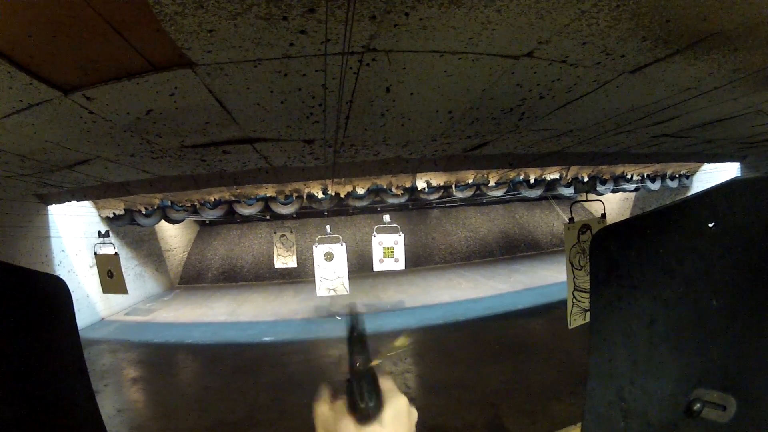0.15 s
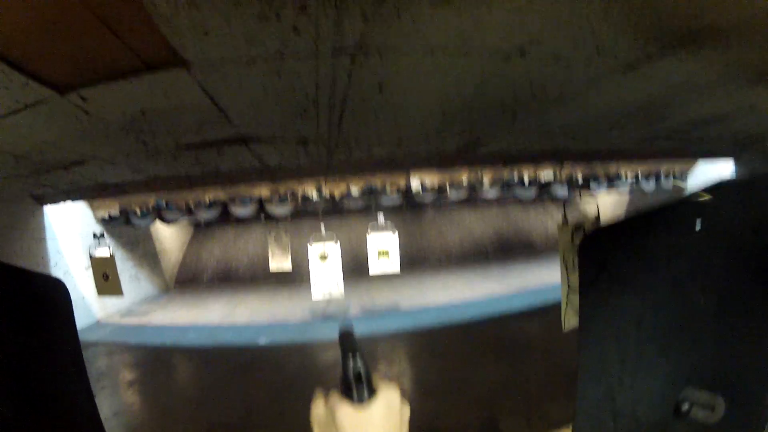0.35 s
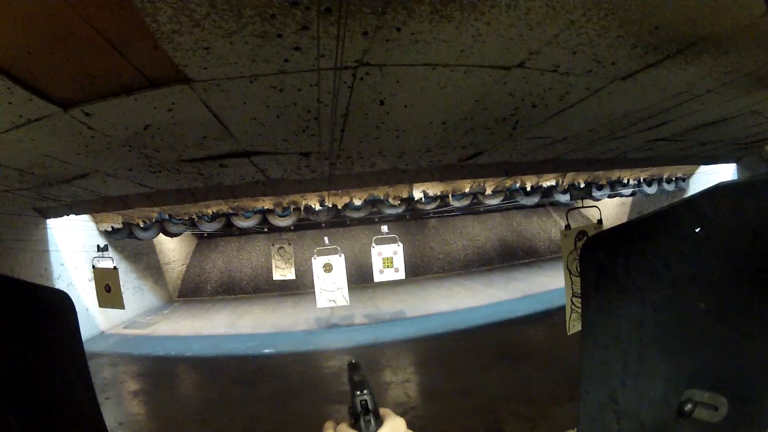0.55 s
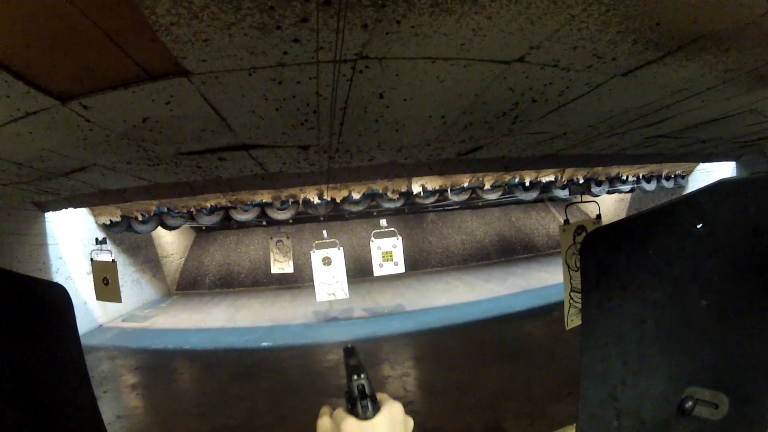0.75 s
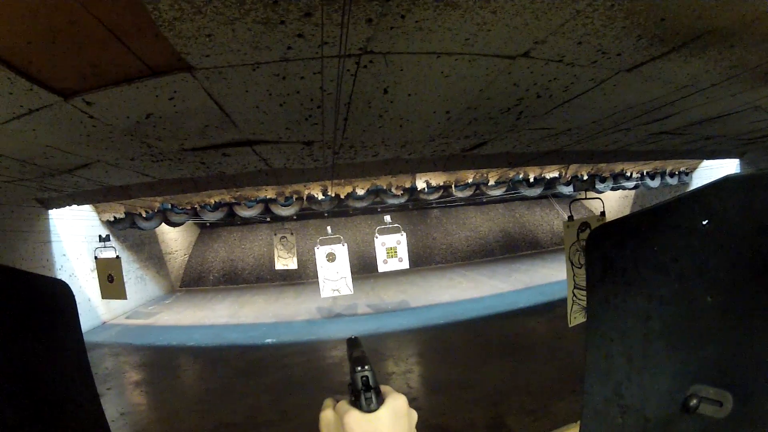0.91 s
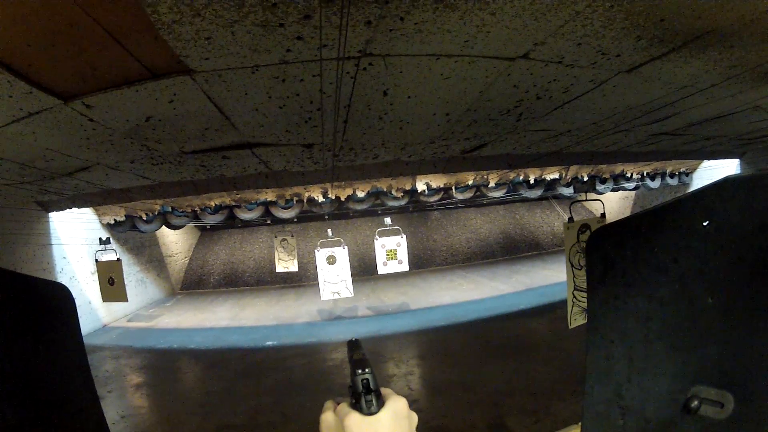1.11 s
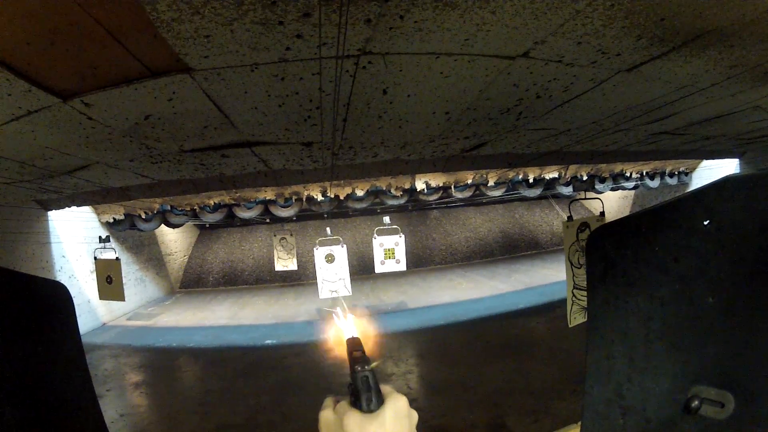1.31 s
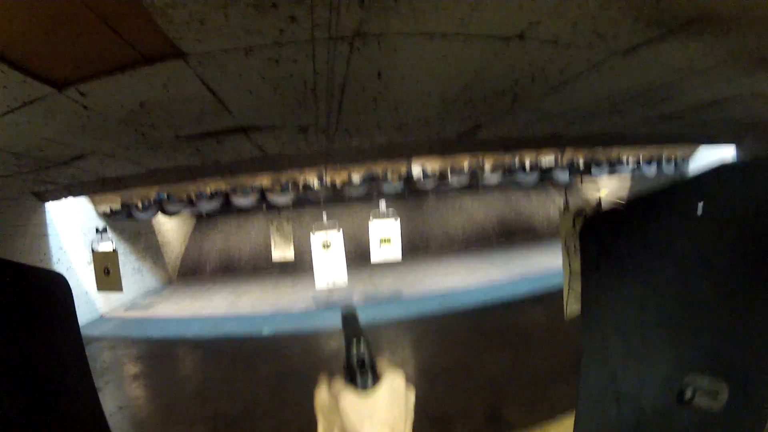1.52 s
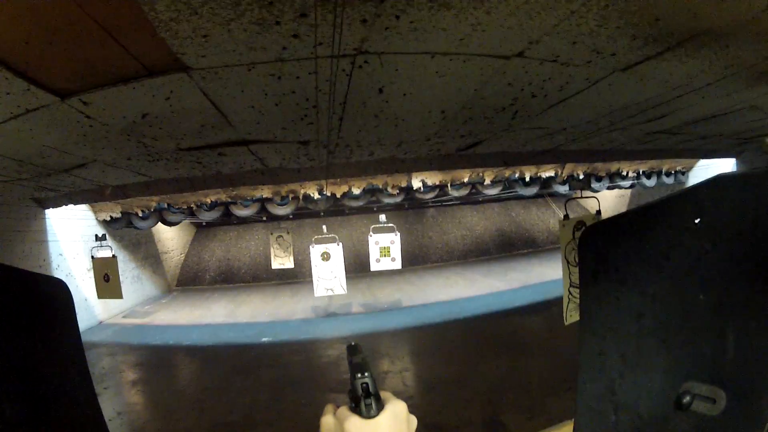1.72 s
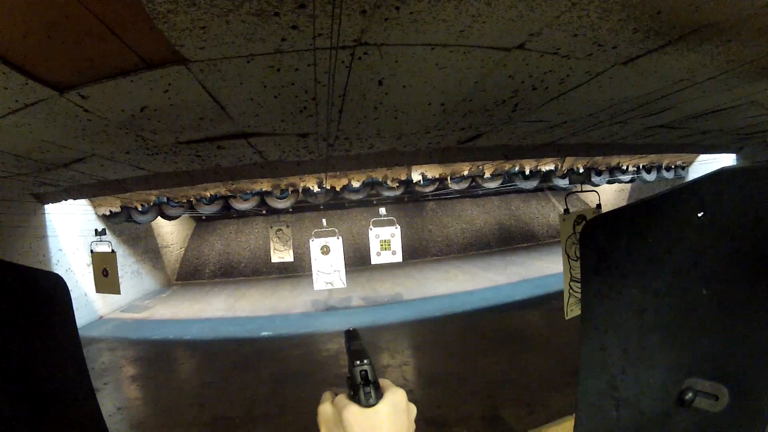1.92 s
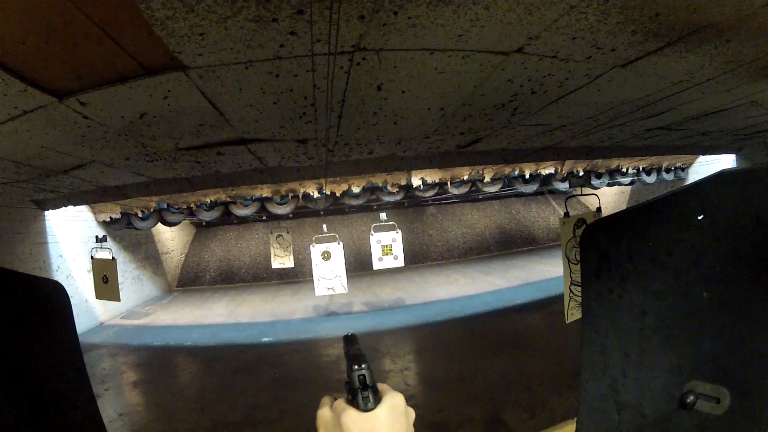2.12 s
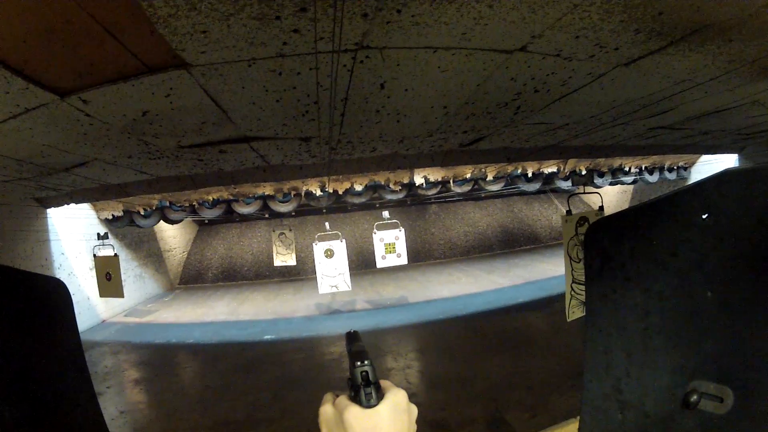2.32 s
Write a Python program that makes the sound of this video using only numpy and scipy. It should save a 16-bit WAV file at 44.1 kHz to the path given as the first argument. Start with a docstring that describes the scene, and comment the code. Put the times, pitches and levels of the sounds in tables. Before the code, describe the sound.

Loud pistol shots crack in an indoor shooting range, overloading the microphone and roaring through the hall.

```python
"""Shots in an indoor range

Four pistol shots, three close and one from another lane, reach a small mono camera. Each is shaped noise plus
booth and hall echoes; close ones add a pressure wave. The microphone overloads, then the automatic volume
ducks; as it recovers, it holds up the hall's roar before that dies. Light clacks, probably spent cases hitting
the booth, mix noise, metal ringing and a dull knock. Shaped noise makes the ventilation rumble."""
import sys
import numpy as np
from scipy import signal
from scipy.fft import rfft, irfft
from scipy.io import wavfile
from scipy.ndimage import minimum_filter1d

SR = 44100
rng = np.random.default_rng(int(sys.argv[2]) if len(sys.argv) > 2 else 0)


def unload_wav(signal):
    """Save mono or channel-first audio to the path in sys.argv[1] as 16-bit WAV at rate SR, clipped to [-1, 1]."""
    wavfile.write(
        sys.argv[1],
        SR,
        np.round(np.clip(np.atleast_2d(signal).T, -1, 1) * 32767).astype(np.int16),
    )


N = 103635  # length in samples

# In the tables, decay_s is the time to fall to 37 %, t60_s the time to fall by 60 dB.
# Spectra give the balance between pitches; their overall level is set elsewhere.

# Close shots: start_s, blast_db, decay_s, booth_db, hall_db
CLOSE_SHOTS = [(0.2008, 1.5, .013, -2.5, -8), (1.226, 0.5, 0.0096, -5, -10.5),
               (1.394, 8.5, 0.0072, -33, -8)]
# Pressure wave of the close muzzles: start_s, level_db, period_s
PRESSURE_WAVES = [(0.2006, 4.5, .0105), (1.2285, -3, .0068), (1.3952, 8.5, .0068)]
# Spectrum of a close blast: pitch_hz, level_db (per Hz)
BLAST_SPECTRUM = [(40, -30.5), (150, -7), (250, -2), (340, 0), (460, 3), (590, 0.5), (780, 0.5),
                  (950, -4.5), (1120, -6), (1500, 1), (2200, 0.5), (3000, 3), (3800, -1), (5000, -14.5),
                  (6200, -26.5), (8000, -5.5), (9300, -7.5), (11000, -25.5), (12500, -26.5), (14500, -16),
                  (16000, -8.5)]
# Spectrum of the booth's short echo: pitch_hz, level_db (per Hz)
BOOTH_SPECTRUM = [(60, -40.5), (350, -13.5), (600, -22.5), (900, -12.5), (1350, -8), (1610, 0.5),
                  (1780, -12), (2000, 3.5), (2400, -1.5), (2760, 2.5), (3050, -7.5), (3500, -7),
                  (4500, -17), (6000, -27.5), (8000, -17), (9400, -9), (10500, -15.5), (11400, -34),
                  (12700, -18), (13700, -17), (15000, -13.5), (15800, -29.5)]
# Spectrum of the hall's roar: pitch_hz, level_db (per Hz)
HALL_SPECTRUM = [(35, -20.5), (70, -17), (130, -2.5), (200, -5.5), (450, -3.5), (620, -4), (800, 1.5),
                 (1180, -9.5), (1500, -2), (1900, -7.5), (2650, -6), (3300, -12.5), (4200, -17.5),
                 (5400, -22.5), (6000, -41), (6600, -25), (8000, -23.5), (9500, -15.5), (10600, -22),
                 (11500, -26.5), (12000, -27), (12600, -24.5), (14400, -20), (15200, -19.5), (15700, -56.5)]
# How long the hall rings at each pitch: pitch_hz, t60_s
HALL_RINGING = [(100, 0.83), (300, 0.78), (900, 0.68), (2500, 0.86), (5000, 0.77), (10000, 0.86),
                (15000, 0.83)]
# Shot from another lane, arriving directly and off a wall: start_s, level_db, rise_s, decay_s
OTHER_LANE_CRACKS = [(1.7604, -12.5, 0.0021, 0.02), (1.766, -19, 0.00041, 0.015),
                     (1.7693, -7.5, 0.0012, 0.0019), (1.777, -15, 0.00041, 0.0013)]
# Spectrum of the other lane's shot: pitch_hz, level_db (per Hz)
OTHER_LANE_SPECTRUM = [(50, -15), (150, -10), (300, -5), (440, 7), (600, -11), (880, 13), (1120, -17),
                       (1600, -3), (2400, 6.5), (3300, -12), (4600, -10), (6000, -16.5), (8000, -15),
                       (9500, -9.5), (12000, -15.5), (14500, -17), (16000, -35)]
# Light clacks: start_s, level_db, decay_s, booth_db, metal_db, knock_db
LIGHT_CLACKS = [(0.5048, -23, 0.004, -40, -37.5, -32.5), (0.8453, -30.5, 0.0037, -44.5, -49, -70),
                (0.8486, -23.5, 0.0043, -37, -37.5, -50), (1.1257, -36.5, 0.0086, -44.5, -44, -64),
                (1.7272, -24, 0.0078, -48, -44, -31.5), (2.0438, -20, 0.0049, -32.5, -43, -44.5),
                (2.1077, -34.5, .005, -57, -60, -40)]
# Tones of the struck metal: pitch_hz, level_db, t60_s
METAL_TONES = [(1630, 0.5, 0.25), (1850, -4, 0.051), (2700, 6, 0.057), (2853, -3, 0.2), (9300, -9, .14)]
# Spectrum of the booth panel's dull knock: pitch_hz, level_db (per Hz)
KNOCK_SPECTRUM = [(50, -33), (130, 4), (220, -9), (360, 1.5), (600, -13), (2000, -25), (16000, -70)]
# Spectrum of the ventilation rumble: pitch_hz, level_db (per Hz)
VENTILATION_SPECTRUM = [(15, -6), (33, 0), (60, -10.5), (130, -14), (300, -19), (800, -30), (2000, -34),
                        (4000, -40), (8000, -50), (16000, -57)]

BLAST_RISE_S, SWELL_DAMPING = 0.00052, 0.2  # damping is per cycle
BOOTH_T60_S, BOOTH_RISE_S, HALL_RISE_S = 0.35, 0.003, 0.013
CLUMP_DB, CLUMP_S = 1, 0.009  # early reflections arrive in clumps
LANE_BOOTH_DB, LANE_HALL_DB, LANE_LOW_CUT_HZ = -7.5, -14, 590
CLACK_RISE_S, CLACK_HALL_DB = 0.00027, -22.5  # hall level of a clack relative to its booth ring
KNOCK_T60_S = 0.21
VENTILATION_DB = -54.5
# Automatic volume: when it acts, how fast it recovers, how long it holds
THRESHOLD_DB, RECOVERY_DB_PER_S, HOLD_S = -17.5, 90, 0.046
LAG_S, ATTACK_S, SENSE_S = 0.0062, 0.0017, 0.011
KNEE = 4  # a higher number makes overload set in more abruptly
NOTCH_HZ, NOTCH_WIDTH_HZ, EDGE_HZ = 12000, 2400, 16000


def amp(db):
    """Turn decibels into a multiplier."""
    return 10 ** (np.asarray(db) / 20)


def read(points, hz):
    """Read a table between its points, on a logarithmic pitch axis."""
    table_hz, value = np.transpose(points)
    return np.interp(np.log(hz + 1), np.log(table_hz + 1), value)


def spectrum_gain(spectrum):
    """Multiplier for every frequency of a sound N samples long."""
    return amp(read(spectrum, np.fft.rfftfreq(N, 1 / SR)))


def noise(spectrum):
    """Steady noise of unit power, coloured by a spectrum."""
    white = rng.standard_normal(N)
    coloured = irfft(rfft(white) * spectrum_gain(spectrum), N)
    return coloured / coloured.std()


def since(start):
    """Seconds since an event, zero before it."""
    return np.maximum(np.arange(N) / SR - start, 0)


def fade(t, t60):
    """A natural dying-away that loses 60 dB in t60 seconds."""
    return np.exp(-np.log(1000) * t / t60)


def smooth(x, seconds):
    """Running average over the time just past."""
    width = max(seconds * SR, 1)
    window = np.clip(width - np.arange(int(width) + 1), 0, 1)
    return np.convolve(x, window / window.sum())[:N]


def shots():
    """Each close blast sends out a pressure wave and sets the booth and hall echoing."""
    total = np.zeros(N)
    for start, blast_db, decay, booth_db, hall_db in CLOSE_SHOTS:
        total += burst(BLAST_SPECTRUM, start, blast_db, BLAST_RISE_S, decay)
        total += booth(start, booth_db) + hall(start, hall_db)
    for start, db, period in PRESSURE_WAVES:
        total += swell(start, db, period)
    return total


def burst(spectrum, start, db, rise, decay):
    """A crack crowded with its nearest reflections: noise that rises quickly and dies exponentially."""
    t = since(start)
    attack = np.sqrt(np.minimum(t / rise, 1))
    fall = np.exp(-np.maximum(t - rise, 0) / decay)
    # Shape once before colouring and once after; together they give the whole fall.
    half_shape = attack * np.sqrt(fall)
    # Keep only the timing (phase) of the noise, so the spectrum comes out even.
    phase = np.angle(rfft(half_shape * rng.standard_normal(N)))
    coloured = irfft(spectrum_gain(spectrum) * np.exp(1j * phase), N)
    crack = half_shape * coloured
    return amp(db) * crack * np.linalg.norm(attack * fall) / np.linalg.norm(crack)


def swell(start, db, period):
    """The muzzle's pressure wave swings the microphone to and fro once."""
    cycles = np.minimum(since(start) / period, 1)
    swing = -np.sin(2 * np.pi * cycles)
    soft_ends = np.sqrt(abs(np.sin(np.pi * cycles)))
    return amp(db) * swing * soft_ends * np.exp(-SWELL_DAMPING * cycles)


def booth(start, db):
    """Short bright echo of the booth: fading noise whose level wavers in uneven clumps."""
    t = since(start)
    clumps = smooth(rng.standard_normal(N), CLUMP_S)
    level = amp(db + CLUMP_DB * clumps / clumps.std())
    rise = np.minimum(t / BOOTH_RISE_S, 1)
    return level * rise * fade(t, BOOTH_T60_S) * noise(BOOTH_SPECTRUM)


def hall(start, db, size=512):
    """Long roar of the concrete range: noise whose pitches each die at their own speed."""
    hz, t, bands = signal.stft(noise(HALL_SPECTRUM), SR, nperseg=size)
    t60 = read(HALL_RINGING, hz)[:, None]
    fading_bands = bands * fade(np.maximum(t - start, 0), t60)
    tail = signal.istft(fading_bands, SR, nperseg=size)[1][:N]
    return amp(db) * np.minimum(since(start) / HALL_RISE_S, 1) * tail


def lane_shot():
    """A shot from another lane: cracks arriving directly and off a wall, and a roar with less bass."""
    hall_start, booth_start = OTHER_LANE_CRACKS[0][0], OTHER_LANE_CRACKS[1][0]
    cracks = sum(burst(OTHER_LANE_SPECTRUM, *row) for row in OTHER_LANE_CRACKS)
    low_cut = signal.butter(1, LANE_LOW_CUT_HZ, "high", fs=SR)
    roar = signal.lfilter(*low_cut, hall(hall_start, LANE_HALL_DB))
    return cracks + booth(booth_start, LANE_BOOTH_DB) + roar


def clacks():
    """Light metallic knocks that shake a panel and ring in the booth and faintly in the hall."""
    total = np.zeros(N)
    for start, db, decay, booth_db, metal_db, knock_db in LIGHT_CLACKS:
        total += burst(BOOTH_SPECTRUM, start, db, CLACK_RISE_S, decay)
        total += metal(start, metal_db) + knock(start, knock_db)
        total += booth(start, booth_db) + hall(start, booth_db + CLACK_HALL_DB)
    return total


def metal(start, db):
    """Brief ring of struck metal: a few pure tones, each fading at its own speed."""
    t = since(start)
    ring = np.zeros(N)
    for hz, level_db, t60 in METAL_TONES:
        tone = np.sin(2 * np.pi * (hz * t + rng.random()))
        ring += amp(level_db) * fade(t, t60) * tone
    return amp(db) * np.minimum(t / CLACK_RISE_S, 1) * ring


def knock(start, db):
    """Low, dull answer of the struck panel: fading noise."""
    t = since(start)
    rise = np.minimum(t / BOOTH_RISE_S, 1)
    return amp(db) * rise * fade(t, KNOCK_T60_S) * noise(KNOCK_SPECTRUM)


def ventilation():
    """Steady rumble of moving air: noise with most of its strength in the bass."""
    return amp(VENTILATION_DB) * noise(VENTILATION_SPECTRUM)


def scene():
    """Shots, clacks and ventilation, the same in both channels."""
    mono = shots() + lane_shot() + clacks() + ventilation()
    return np.array([mono, mono])


def record(dry):
    """Late-acting automatic volume, then overload, a notch in the treble and an upper pitch limit."""
    t = np.arange(N) / SR
    level_db = 10 * np.log10(smooth((dry ** 2).mean(0), SENSE_S) + 1e-12)
    # Hold the loudest level of the time just past.
    half = int(HOLD_S * SR / 2)
    held_db = -minimum_filter1d(-level_db, 2 * half + 1, origin=half, mode="nearest")
    # After each peak, let the sensed level sink no faster than the recovery speed.
    recovery = RECOVERY_DB_PER_S * t
    sensed_db = np.maximum.accumulate(held_db + recovery) - recovery
    over_db = np.maximum(sensed_db - THRESHOLD_DB, 0)
    late_cut_db = np.interp(t - LAG_S, t, smooth(over_db, ATTACK_S))
    ducked = dry * amp(-late_cut_db)
    # Overload rounds off the peaks.
    clipped = ducked / (1 + abs(ducked) ** KNEE) ** (1 / KNEE)
    notch = signal.iirnotch(NOTCH_HZ, NOTCH_HZ / NOTCH_WIDTH_HZ, SR)
    notched = signal.lfilter(*notch, clipped)
    low_pass = signal.firwin(127, EDGE_HZ, window=("kaiser", 7), fs=SR)
    return signal.oaconvolve(notched, low_pass[None], "same")


dry = scene()
out = record(dry)
unload_wav(out)
```